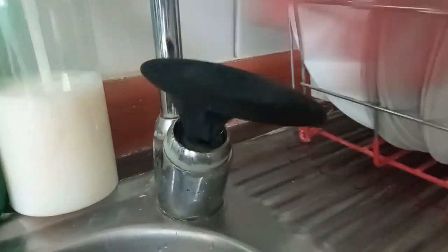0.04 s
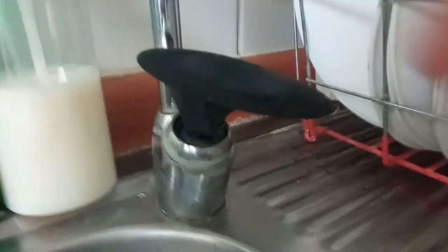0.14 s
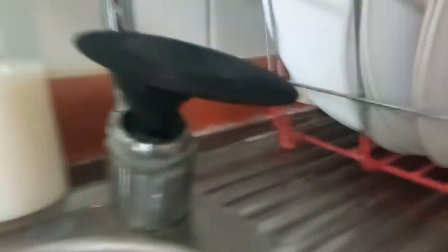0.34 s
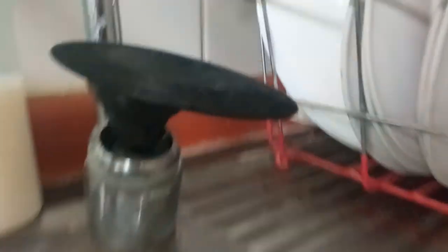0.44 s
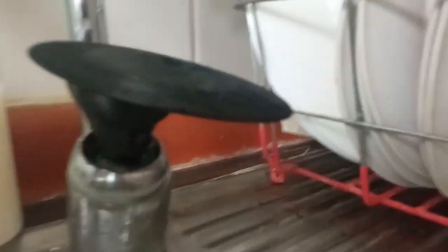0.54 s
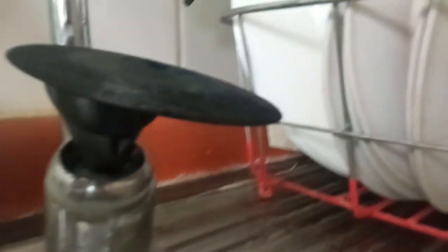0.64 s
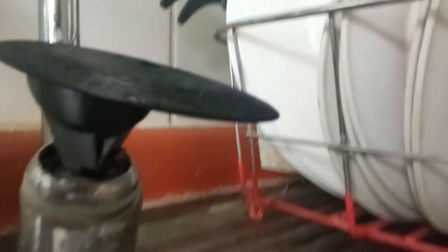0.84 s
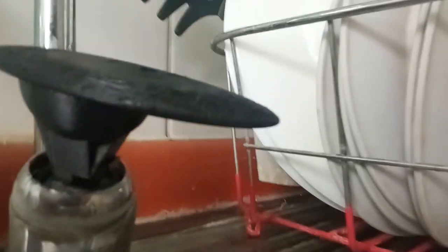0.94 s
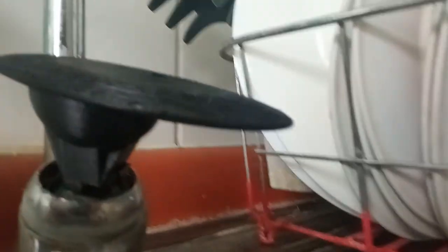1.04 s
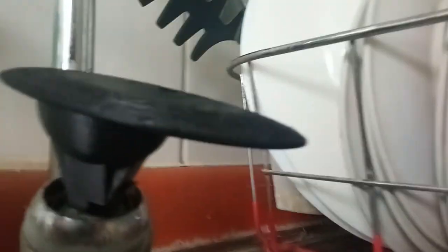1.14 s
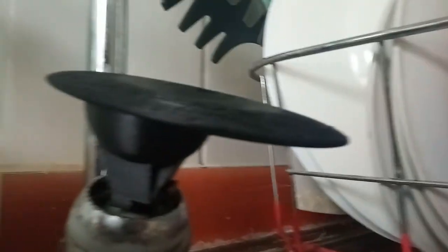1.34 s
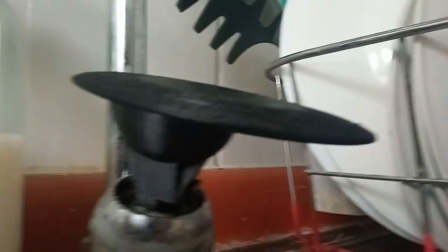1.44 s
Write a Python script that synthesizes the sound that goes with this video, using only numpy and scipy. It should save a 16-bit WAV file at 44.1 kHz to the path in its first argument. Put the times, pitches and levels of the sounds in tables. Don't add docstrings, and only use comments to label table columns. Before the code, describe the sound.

Very close hand noise on a phone case: a sharp knock, then a burst of snaps, rubs and dry swishes. Behind, faint water trickles in a steel sink, with small drips at the end.

```python
import sys
import numpy as np
from scipy import signal
from scipy.fft import rfft, irfft, next_fast_len
from scipy.io import wavfile
from scipy.ndimage import uniform_filter1d, map_coordinates

SR = 44100
rng = np.random.default_rng(int(sys.argv[2]) if len(sys.argv) > 2 else 0)


def ratio_of_db(decibels):
    return 10 ** (np.asarray(decibels, float) / 20)


def materialize(psi):
    bounded = np.clip(np.atleast_2d(psi).T, -1, 1)
    quanta = np.round(bounded * 32767).astype(np.int16)
    wavfile.write(sys.argv[1], SR, quanta)


N = 66150
TIME = np.arange(N) / SR


def unit(x):
    return x / np.sqrt(np.mean(x ** 2) + 1e-20)


def wobble(rate):
    knots = rng.standard_normal(int(N * rate / SR) + 4)
    return map_coordinates(knots, [np.arange(N) * rate / SR])


def filtered(x, response):
    m = next_fast_len(len(x) + 8192)
    spectrum = rfft(x, m) * response(np.fft.rfftfreq(m, 1 / SR))
    return irfft(spectrum, m)[:len(x)]


def along(points, hz):
    f, db = np.transpose(points)
    return ratio_of_db(np.interp(np.log(hz + 1), np.log(f + 1), db))


def peak(f, hz, width_hz):
    return 1j * f * width_hz / (hz * hz - f * f + 1j * f * width_hz)


def steady(x):
    power = np.abs(uniform_filter1d(x ** 2, round(0.02 * SR))) + 1e-20
    evenness = 0.8
    return unit(x / power ** (evenness / 2))


def grit(rate, scatter_db, share):
    when = rng.random(N) < rate / SR
    slips = when * rng.standard_normal(N) * ratio_of_db(scatter_db * np.minimum(rng.exponential(size=N), 3))
    return share * unit(slips) + np.sqrt(1 - share ** 2) * rng.standard_normal(N)


def stroke(start, length, db, place):
    edge_s, swell_db = 0.017, 14
    t = TIME - start
    off = np.interp(t / length, [0, np.clip(place, 0.05, 0.95), 1], [-1, 0, 1])
    swell = ratio_of_db(db - swell_db * np.abs(off) ** 1.25)
    fade_in = np.clip(t / edge_s, 0, 1)
    fade_out = np.clip((length - t) / (0.89 * edge_s), 0, 1)
    return swell * fade_in * fade_out


def add(out, s, x):
    part = out[round(s * SR):][:len(x)]
    part += x[:len(part)]


def drags():
    # (start [s], length [s], level [dB], peak place [0-1], body [Hz])
    drag_rows = [(.008, 0.12, -62, 0.44, 1260), (1.344, 0.22, -61, 0.33, 1100),
                 (0.187, 0.076, -47, 0.7, 1880), (0.265, 0.089, -53, 0.3, 2190),
                 (0.385, 0.034, -52, 0.4, 1100), (0.398, 0.099, -43.5, 0.73, 2780),
                 (0.425, 0.065, -46, 0.51, 950), (0.497, 0.0435, -63, 0, 2280),
                 (0.525, 0.14, -62, 0.48, 1000), (0.613, 0.11, -65, 0.36, 2170),
                 (0.674, 0.11, -54, 0.34, 1980), (0.751, 0.11, -45.5, 0.43, 1374),
                 (0.848, 0.095, -47.5, 0.87, 1460), (0.916, 0.17, -42, 0.51, 1370),
                 (1.045, 0.13, -53, 0.66, 1700), (1.159, 0.078, -39.5, 0.4, 1300),
                 (1.164, 0.065, -49.5, 0.45, 5600), (1.083, 0.16, -46, 0.61, 890),
                 (1.022, 0.049, -51, 0.64, 2950)]
    top_hz, low_hz, wide = 3600, 463, 0.75
    rub = grit(3300, 5.5, 0.51) * ratio_of_db(1.3 * wobble(120))

    def case(f, hz):
        top = max(top_hz, 1.46 * hz)
        treble_cut = 1 / (1 + (1j * f / top) ** 2 + 0.9j * f / top) ** 3
        low_cut = f / (f - 1j * low_hz)
        return treble_cut * low_cut * peak(f, hz, wide * hz)

    out = np.zeros(N)
    for s, length, db, place, hz in drag_rows:
        body = steady(filtered(rub, lambda f: case(f, hz)))
        out += stroke(s, length, db, place) * body
    return out


def snaps():
    # (time [s], peak level [dB], pitch [Hz], thump over snap [dB], tick over snap [dB])
    snap_rows = [(0.2769, -43, 1470, -5, -25), (.535, -55.5, 885, 9, -30), (0.658, -25, 1570, -6, -40),
                 (0.7, -35.5, 2200, -19, -9.5), (0.7062, -24, 2000, -15.5, -19.5),
                 (0.7561, -23, 1520, -10, -30), (0.7843, -45, 684, 11, -30), (0.8019, -29.5, 1320, 2, -17),
                 (0.8659, -41, 900, 0, -6), (0.8683, -55, 600, 12, -30), (0.8902, -36, 1470, -27, -40),
                 (0.892, -22, 1700, -6, -32), (0.8957, -27.5, 2470, -24, -29),
                 (0.8964, -30, 2450, -3.5, -40), (0.9122, -31.5, 1200, 10.5, -22),
                 (1.0764, -32.5, 740, -18, -32), (1.0781, -42, 704, 8.5, -48),
                 (.458, -34.5, 830, -17.5, -35)]
    cycles, sag = 3.02, 0.42
    thump_hz, thump_t60, thump_lag_s = 356, 0.0081, 0.00097
    sinks = 0.01
    out, t = np.zeros(N), np.arange(SR // 25) / SR
    for s, db, hz, thump_db, tick_db in snap_rows:
        life = cycles / hz
        turns = hz * (sag * t + (1.6 - sag) * life / 3 * (1 - np.exp(-3 * t / life)))
        onset = 1 - np.exp(-(t * hz / 0.35) ** 2)
        snap = -np.sin(2 * np.pi * turns) * ratio_of_db(-60 * t / (1.58 * life)) * onset
        tick = ratio_of_db(tick_db - 60 * t / 0.0027) * rng.standard_normal(len(t))
        late = np.maximum(t - thump_lag_s, 0)
        pitch = thump_hz * (1 + 0.021 * rng.standard_normal() - sinks * thump_db)
        thump = ratio_of_db(thump_db - 60 * late / thump_t60) * np.sin(2 * np.pi * pitch * late)
        add(out, s, 3.04 * ratio_of_db(db) * (snap + tick + thump))
    return out


def knock():
    # (time [s], peak level [dB], crack level [dB])
    contacts = [
        (0.3617, -47.5, 7),
        (0.3639, -45, 3),
        (0.3654, -14.5, -5.5),
        (.3690, -24.5, -27),
        (.375, -34.5, -32),
        (0.381, -49, -25),
        (.394, -40, -25),
    ]
    # (pitch [Hz], level [dB], t60 [s])
    shell = [(111, -19.5, 0.056), (433, -7.5, 0.034), (690, 0, 0.011), (910, 3, 0.011), (1200, -9, 0.0085),
             (1700, -11, 0.013), (2980, -13, 0.0058), (3800, -18, 0.0052), (4600, -16, 0.0059),
             (6480, -8.5, 0.0027), (9500, -9, 0.0014)]
    out, t = np.zeros(N), np.arange(SR // 8) / SR
    for s, db, crack_db in contacts:
        ring = np.zeros(len(t))
        for hz, mode_db, t60 in shell:
            bright_db = (crack_db + 14) * (hz > 2000)
            ring += ratio_of_db(mode_db - 60 * t / t60 + bright_db) * np.sin(2 * np.pi * hz * t)
        crack = ratio_of_db(crack_db - 1 - 60 * t / 0.0035) * rng.standard_normal(len(t))
        add(out, s, ratio_of_db(db) * (crack - ring) * (1 - np.exp(-t / 0.00046)))
    return out


def plates():
    # (pitch [Hz], level [dB])
    lines = [(6650, -60), (7600, -65), (9350, -65), (2700, -62)]
    start_s, ring_s = 0.378, 0.022
    out, t = np.zeros(N), np.arange(round(ring_s * SR)) / SR
    swell = np.sqrt(np.sin(np.pi * t / ring_s))
    add(out, start_s, swell * sum(ratio_of_db(db) * np.sin(2 * np.pi * hz * t) for hz, db in lines))
    return out


def swishes():
    # (start [s], length [s], level [dB], peak place [0-1])
    swish_rows = [(0.202, 0.059, -45.5, 0.68), (0.259, 0.095, -56.5, 0.54), (0.38, 0.12, -47.5, 0.32),
                  (0.473, 0.085, -53.5, 0.46), (0.59, 0.097, -60, 0.57), (0.68, 0.13, -58, 0.47),
                  (0.769, 0.053, -38.5, 0.39), (0.842, 0.1, -55.5, 0.37), (0.9, 0.19, -55, 0.52),
                  (1.073, 0.099, -73, 0), (1.156, 0.036, -57, .5), (1.166, 0.084, -49.5, 0.27)]
    # (frequency [Hz], level [dB])
    skin = [(1500, 2), (3000, 4), (5200, -0.5), (7200, 0.5), (10500, -7.5), (12800, -18), (15000, -11.5),
            (16000, -22)]
    hiss = steady(filtered(grit(5500, 1.0, 0.56), lambda f: along(skin, f)))
    hiss = hiss * ratio_of_db(2.76 * wobble(88.744))
    return hiss * sum(stroke(*row) for row in swish_rows)


def murmurs():
    # (start [s], length [s], level [dB], peak place [0-1])
    presses = [
        (0.167, 0.11, -54, 0.32),
        (0.254, 0.16, -56, 0.14),
        (0.603, 0.081, -53.5, 0.49),
        (0.696, 0.19, -49, 0.3),
        (0.927, 0.24, -47.5, 0.15),
        (1.146, 0.12, -49, 0.49),
    ]
    body = filtered(grit(700, 4.1, 0.66), lambda f: peak(f, 393, 370) ** 2)
    return steady(body) * sum(stroke(*row) for row in presses)


def trickle():
    # (pitch [Hz], width [Hz], level at first [dB], level at the end [dB])
    basin = [(1403, 29, -3.5, -19), (2050, 65, 0, -13.5), (2224, 104, 4, -2), (2910, 44, -7.5, -11),
             (3075, 82, -11, -3), (3850, 380, -18, -3), (4680, 100, -23, -5), (5600, 220, -11, -6.5),
             (6570, 210, -11.5, -6.5), (7640, 47, -25, -8), (9280, 760, -14.5, -8)]
    # (time [s], level [dB])
    flow = [(0, -61), (.1, -68), (.17, -62.5), (.55, -59), (.85, -62.5), (1.25, -59.5), (1.5, -57.5)]
    splash = grit(1400, 6.6, 0.18)
    late = np.arange(N) / N
    ring = np.zeros(N)
    for hz, width_hz, first_db, last_db in basin:
        sway_db = 1.5 * wobble(15.65)
        mode = unit(filtered(splash, lambda f: peak(f, hz, 1.04 * width_hz) * peak(f, hz, 6 * width_hz)))
        ring += ratio_of_db(first_db + (last_db - first_db) * late + sway_db) * mode
    return ratio_of_db(np.interp(TIME, *np.transpose(flow)) - 6.5) * ring


def splashes():
    # (time [s], level [dB], centre [Hz], t60 [s])
    splash_rows = [(.012, -60, 6440, 0.06), (0.017, -54.5, 4200, 0.051), (.018, -53, 1440, 0.046),
                   (.048, -50, 3660, 0.03), (.052, -62.5, 5800, 0.062), (0.102, -59, 3940, .02),
                   (0.129, -56, 4930, .015), (.148, -64, 10000, 0.017), (.164, -60.5, 3500, 0.028),
                   (.372, -35, 6600, 0.017), (.566, -52, 7500, 0.017), (1.431, -52.5, 3970, 0.031)]
    wide = 0.23
    out, t = np.zeros(N), np.arange(SR // 16) / SR
    for s, db, hz, t60 in splash_rows:
        puff = unit(filtered(rng.standard_normal(len(t)), lambda f: peak(f, hz, wide * hz) ** 2))
        add(out, s, ratio_of_db(db - 60 * t / t60) * (1 - np.exp(-t / 0.0021)) * puff)
    return out


def drips():
    # (time [s], level [dB], pitch [Hz], t60
    # [s])
    drip_rows = [(0.013, -56.5, 3850, 0.02), (0.017, -65, 4270, 0.023), (.049, -52, 3638, 0.016),
                 (0.055, -58, 2790, 0.042), (1.243, -63.5, 3117, 0.47), (1.407, -52, 1124, 0.055),
                 (1.433, -44.5, 3216, 0.022), (1.432, -53, 4930, 0.02), (1.447, -50.5, 837, 0.1),
                 (1.45, -56.5, 1093, 0.091), (1.482, -56, 1700, 0.085)]
    rise, attack_s = 0.0025, 0.0016
    out, t = np.zeros(N), np.arange(SR // 8) / SR
    for s, db, hz, t60 in drip_rows:
        phase = 2 * np.pi * hz * t * (1 + rise * t / t60) + 0.73 * wobble(81)[:len(t)]
        add(out, s, 2 * ratio_of_db(db - 60 * t / t60) * (1 - np.exp(-t / attack_s)) * np.sin(phase))
    return out


def whistle():
    # (time [s], level [dB], pitch [Hz])
    line = [
        (1.22, -90, 4450),
        (1.25, -75, 4470),
        (1.31, -69, 4480),
        (1.351, -64, 4670),
        (1.39, -78, 4760),
        (1.43, -87, 4800),
    ]
    s, db, hz = np.transpose(line)
    db, hz = np.interp(TIME, s, db), np.interp(TIME, s, hz)
    phase = 2 * np.pi * np.cumsum(hz) / SR + 0.6 * wobble(120)
    return ratio_of_db(db + 2.8 * wobble(60.4)) * np.sin(phase)


def gurgle():
    # (time [s], level [dB], pitch [Hz])
    drift = [(0, -58, 133.7), (0.121, -58, 134.7), (0.181, -75.5, 189.4), (0.301, -74, 198.8),
             (0.461, -90, 231.6), (.54, -55, 266.2), (.62, -59.5, 259.7), (0.791, -52, 258.3),
             (0.851, -55, 276.4), (.96, -50, 290), (1.101, -65, 282.1), (1.166, -56, 240.8),
             (1.291, -51, 243.2), (1.359, -62.5, 251.2), (1.5, -56.5, 257.3)]
    wide_hz, lumps_db = 42.2, 2.5
    s, db, hz = np.transpose(drift)
    db, hz = np.interp(TIME, s, db), np.interp(TIME, s, hz)
    turn = 2 * np.pi * np.cumsum(hz) / SR
    band = wobble(2 * wide_hz) * np.cos(turn) + wobble(2 * wide_hz) * np.sin(turn)
    return ratio_of_db(db) * unit(band * ratio_of_db(lumps_db * wobble(15.35)))


def air():
    # (frequency [Hz], density [dB per Hz])
    hush_colour = [(25, -27), (50, -23), (230, -4), (330, 6), (450, -18.5), (1800, -10.5), (6000, -21.5),
                   (11000, -62), (16000, -41)]
    # (time [s], level [dB])
    shake = [(0, -55.5), (.1, -58), (.16, -67), (.21, -64.5), (.29, -60.5), (.34, -67), (.4, -57),
             (.46, -79), (.55, -70), (.7, -67.5), (.8, -53.5), (.85, -71), (.97, -61.5), (1.08, -52.5),
             (1.12, -66), (1.175, -47.5), (1.24, -84), (1.48, -66.5)]
    hush = unit(filtered(rng.standard_normal(N), lambda f: along(hush_colour, f)))
    hush_db = -68.5 + 6.5 * np.arange(N) / N
    rumble = filtered(rng.standard_normal(N), lambda f: peak(f, 118.7, 89.1) ** 2)
    rumble = steady(rumble * ratio_of_db(4.4 * wobble(26.8)))
    rumble_db = 2.6 + np.interp(TIME, *np.transpose(shake))
    return ratio_of_db(hush_db) * hush + ratio_of_db(rumble_db) * rumble


def room(x):
    t60 = 0.076
    t = np.arange(SR // 4) / SR
    tail = filtered(rng.standard_normal(len(t)) * ratio_of_db(-60 * t / t60), lambda f: peak(f, 1070, 2600))
    return signal.fftconvolve(x, tail / np.linalg.norm(tail))[:N]


def suppressed(x):
    # (start [s], length [s], depth [dB], from [Hz])
    shuts = [
        (.186, .011, -12, 3300),
        (.379, .012, -22, 3200),
        (.832, .034, -7, 4000),
        (1.153, .005, -18, 4200),
        (1.47, .017, -8, 4200),
    ]
    close_s, open_s = 0.0052, 0.00061
    for s, length, db, hz in shuts:
        closing = np.clip((TIME - s) / close_s + 0.5, 0, 1)
        opening = np.clip((s + length - TIME) / open_s, 0, 1)
        treble = filtered(x, lambda f: 1 / (1 + (hz / (f + 1)) ** 16))
        x = x - closing * opening * (1 - ratio_of_db(db)) * treble
    return x


def scene():
    soft_snaps = filtered(snaps(), lambda f: (f / (f - 130j)) ** 2 / (1 + 1j * f / 8000) ** 2)
    hits = soft_snaps + knock() + drips() + splashes()
    hand = drags() + murmurs() + swishes()
    water = trickle() + gurgle() + whistle()
    bed = hits + ratio_of_db(-16.5) * room(hits) + hand + water + air()
    return (suppressed(bed) + plates())[None]


def top_cut(x):
    return signal.sosfilt(signal.butter(12, 16970, fs=SR, output="sos"), x)


def record(dry):
    top_hz = 16300
    x = filtered(dry[0], lambda f: (f / (f - 55j)) ** 3 * (f < top_hz))
    return top_cut(x[None])


dry = scene()
out = record(dry)
materialize(out)
```